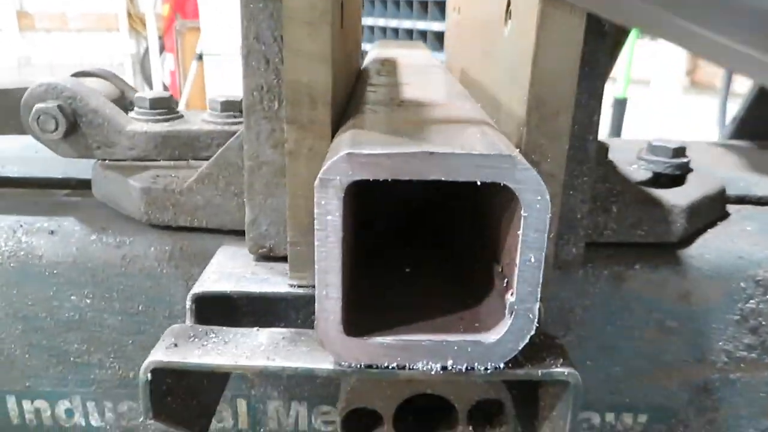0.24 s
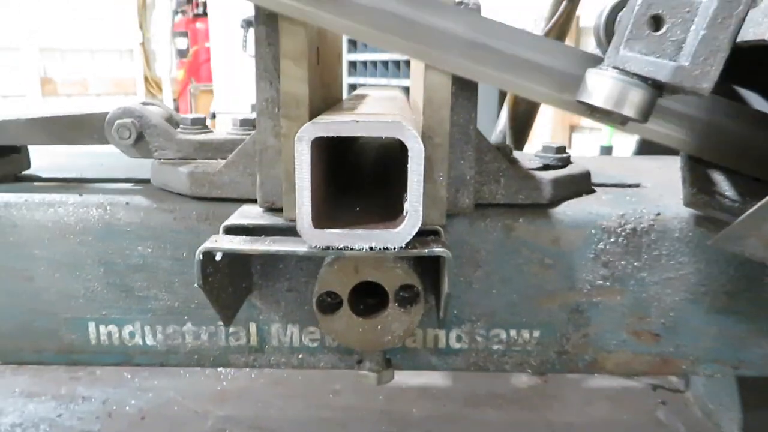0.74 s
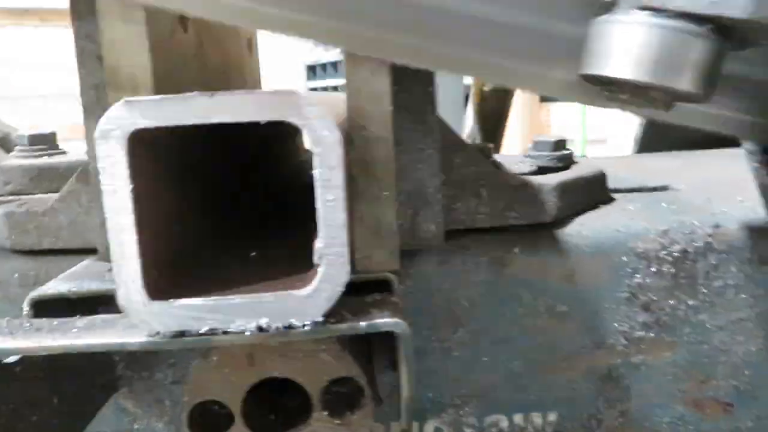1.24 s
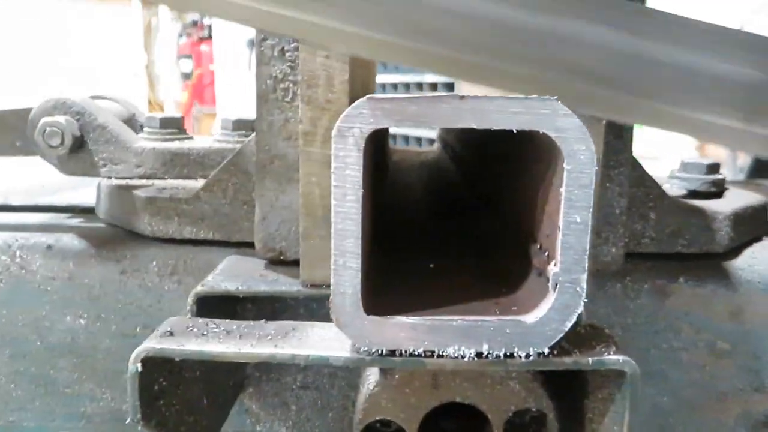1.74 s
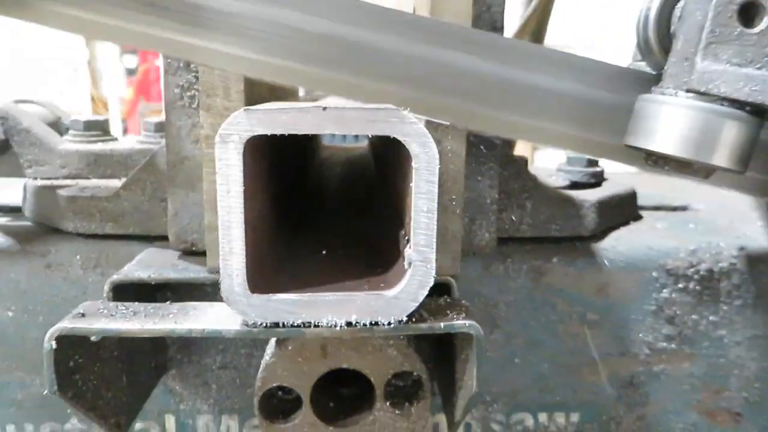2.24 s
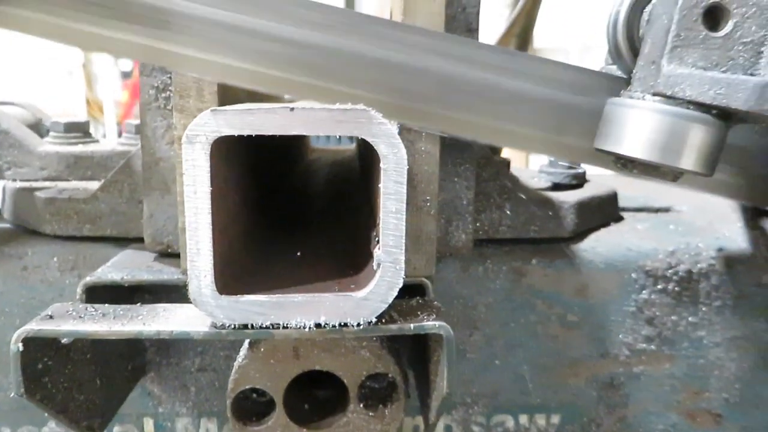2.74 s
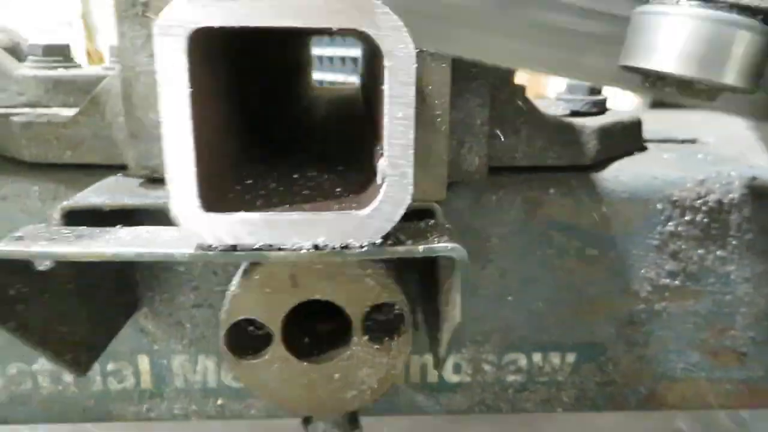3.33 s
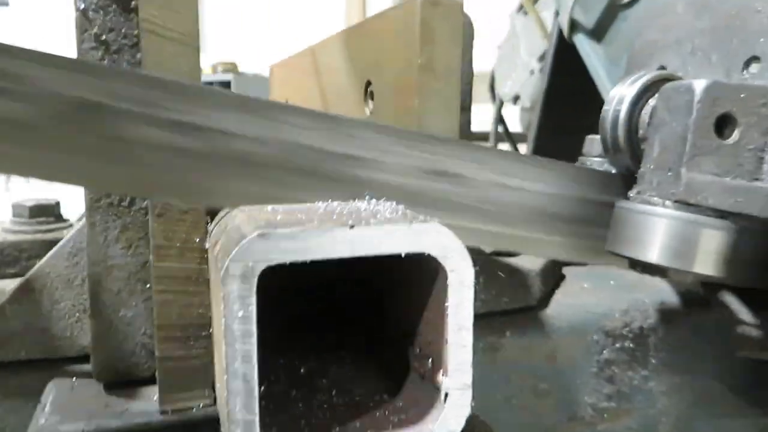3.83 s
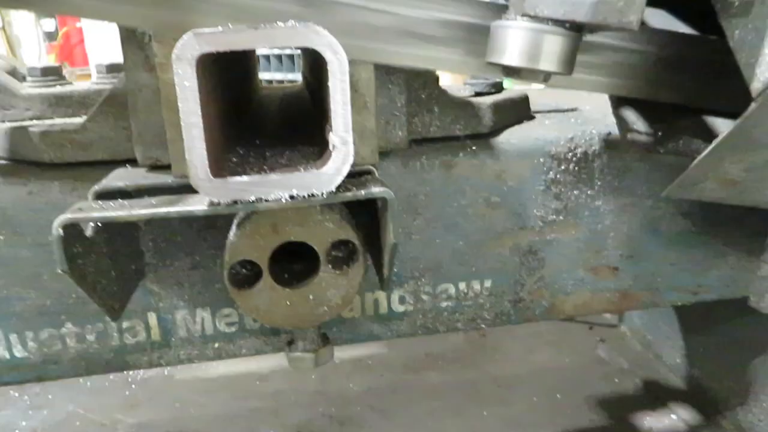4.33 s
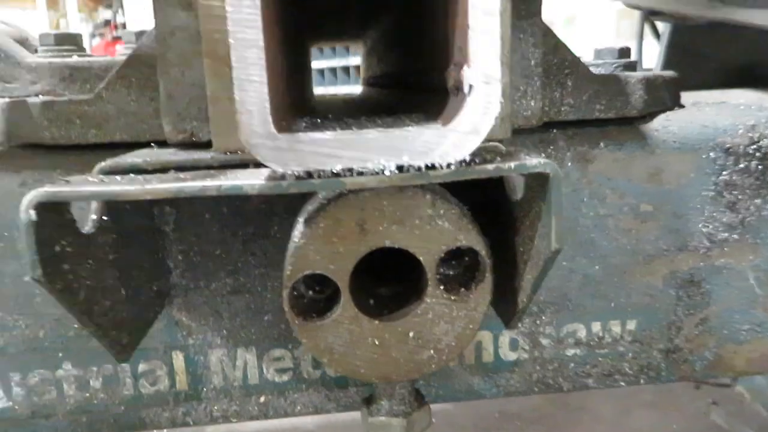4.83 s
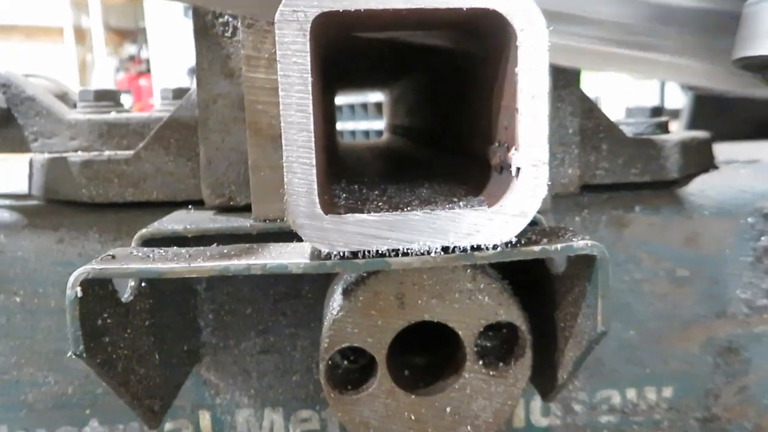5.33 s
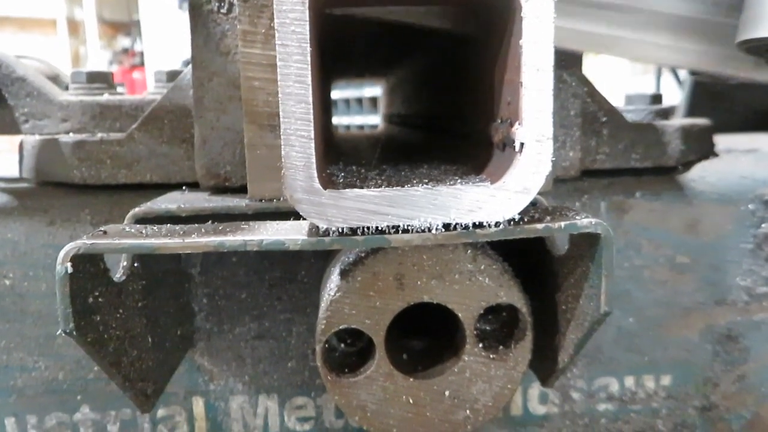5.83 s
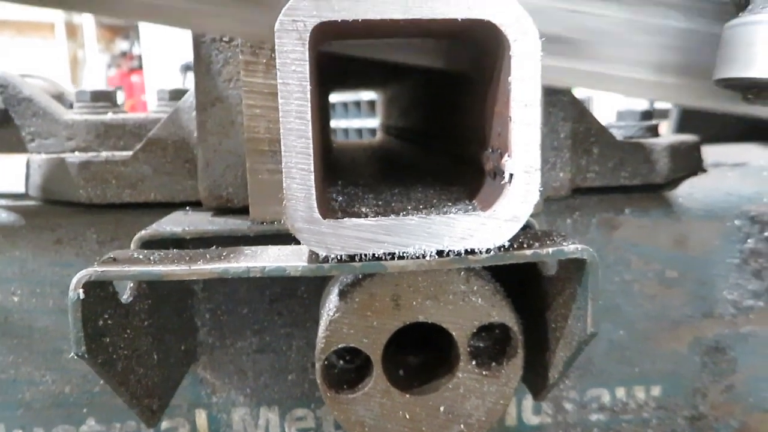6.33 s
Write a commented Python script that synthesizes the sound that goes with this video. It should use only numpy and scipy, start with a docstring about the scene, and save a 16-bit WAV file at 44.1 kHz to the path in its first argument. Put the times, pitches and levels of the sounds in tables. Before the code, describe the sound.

A bandsaw runs throughout, close and dry, cutting a hollow steel tube in a workshop, with no pause or fade. From 0 to 1.7 s the blade touches lightly: a sharp, steady whine near 1.8 kHz, with small hiccups and a fainter second tone, sits over fine gritty rasp, treble rings and humming motor and gear tones. At about 1.7 s the whine collapses within a moment and the full cut begins: a coarser, denser metallic rasp, surging briefly, with shifting tooth tones around 2 to 2.7 kHz, rattling chips, hiss and a rough whistle near 6 kHz. From 3.3 s the blade joint gives short metallic knocks every half second, weakening toward the end, each followed by a tiny dip. Around 5.1 to 5.25 s a guide roller makes three quick squeaks. Grinding continues to 6.6 s, gradually slightly brighter, over very faint rumble and hiss.

```python
"""A horizontal bandsaw cuts a square steel tube, heard close by through a hand-held phone.
Chip clicks ring the resonances of blade, tube and frame; the cut is first light, then bites deeper.
Light contact whines, the full cut adds tooth tones, and treble rings and a rough whistle wander.
The blade joint knocks once a turn late on, the level dips after each knock and at a few other moments,
and a guide roller squeaks briefly. Motor and gear tones hum above faint rumble and hiss."""
import sys
import numpy as np
from scipy import signal
from scipy.fft import rfft, irfft
from scipy.io import wavfile
from scipy.ndimage import uniform_filter1d

SR = 44100
rng = np.random.default_rng(int(sys.argv[2]) if len(sys.argv) > 2 else 0)


def waveform_to_disk(signal):
    """Save audio, clipped to [-1, 1], as 16-bit WAV at the path in sys.argv[1]."""
    frames = np.transpose(np.atleast_2d(signal))
    scaled = np.clip(frames, -1, 1) * 32767
    samples = np.round(scaled).astype(np.int16)
    wavfile.write(sys.argv[1], SR, samples)


N = 290178
T = np.arange(N) / SR
HZ = np.maximum(np.arange(N // 2 + 1) * SR / N, 1)

# Passage from light contact to the full cut: start and end in seconds.
BITE_S = (1.69, 1.72)
# Gear turn rate: in light contact and in the full cut, in Hz.
GEAR_HZ = (82.62, 82.07)
# Resonances of blade, tube and frame. Each row: width in Hz, light gain in dB, full-cut gain in dB.
MODES = [(30, -25, -7), (60, -25.5, -34), (39.7, -23, 3.5), (30, -29, -2), (71, -17, 5.5), (84.5, -15.5, 9),
         (47, -17, 7.5), (50, -6, -23), (130, -9.5, 9), (50, -18, -12), (60, -38, 4.5), (60, -33, -23),
         (180, -15, -9), (125, -4, 1.5), (223, -9, 1), (100, -15, -9.5), (69.6, -12.5, -4.5),
         (80, -21.5, -9), (150, -18.5, -9), (210, -20, -8), (170, -32, -7), (162, -19, -7), (91, -19, -3),
         (80, -25, -30), (280, -28, -8.5), (1330, -36, -11)]
# Blade joint passing the cut, one row a turn. Each row: peak in dB before the high-pass,
# nominal depth in dB of the level dip that follows, share of the lower tube mode in dB.
KNOCKS = [(-15.5, 4, -8), (-16, 4, 0), (-16.5, 3.5, -6), (-19, 2, -5), (-20, 3.5, -3), (-26, 1.6, -3),
          (-26, 1.2, -3)]
FIRST_KNOCK_S, TURN_S = 3.3005, 0.5198


def undb(db):
    """Amplitude ratio from decibels: 20 dB is a factor of ten."""
    return 10 ** (np.asarray(db) / 20)


def unit(x):
    """Normalisation to unit root-mean-square."""
    return x / np.sqrt(np.mean(x ** 2))


def curves(table):
    """Linear interpolation in time of the columns of a table."""
    s, *columns = np.transpose(table)
    return [np.interp(T, s, c) for c in columns]


def walk(rate, count=N):
    """Low-pass random fluctuation: levels held 1 / rate s, averaged twice, scaled to rms 1."""
    hold = int(SR / rate)
    steps = np.repeat(rng.standard_normal(count // hold + 1), hold)
    smooth = uniform_filter1d(uniform_filter1d(steps, hold), hold)
    return unit(smooth[:count])


def colour(points):
    """Spectral envelope: gain at every frequency, in dB linear over log frequency."""
    hz, db = np.transpose(points)
    return undb(np.interp(np.log(HZ), np.log(hz), db))


def tone(hz, db):
    """Phase as the integral of frequency: a sine whose pitch and rms level may move."""
    cycles = np.cumsum(hz + 0 * db) / SR + rng.random()
    return np.sqrt(2) * undb(db) * np.sin(2 * np.pi * cycles)


def cutting(bite, levels_db):
    """Forced resonance: chips ring the saw, in five frequency ranges that each flicker alone."""
    # Borders between the five ranges, in Hz.
    edges_hz = (2400, 3350, 4700, 7000)
    # Broad colour under the resonances in light contact. Each row: frequency in Hz, gain in dB.
    light_broad = [(18, -44), (45, -47), (240, -44), (330, -24.5), (440, -41), (700, -35), (1000, -27.5),
                   (1550, -22), (1800, -12), (2700, -16.5), (3400, -22.5), (4500, -24.5), (6600, -26),
                   (10300, -27.5), (12000, -31.5), (15800, -29.5)]
    # The same in the full cut. Each row: frequency in Hz, gain in dB.
    full_broad = [(18, -22), (45, -22.5), (240, -21.5), (330, -6), (440, -16), (700, -7.5), (1000, -1.5),
                  (1550, -1.5), (2100, 8.5), (3300, -9.5), (4600, -14.5), (6500, -15.5), (9000, -10.5),
                  (12000, -14.5), (15800, -10.5)]
    force = chips()
    _, light_db, full_db = np.transpose(MODES)
    light = force * body(light_db, light_broad)
    full = force * body(full_db, full_broad)
    below = [0] + [1 / (1 + (HZ / edge) ** 16) for edge in edges_hz] + [1]
    out = 0
    for k, db in enumerate(levels_db):
        share = below[k + 1] - below[k]
        light_sound = unit(irfft(light * share, N))
        full_sound = unit(irfft(full * share, N))
        both = (1 - bite) * light_sound + bite * full_sound
        out = out + undb(db + 0.12 * walk(14)) * both
    return out


def chips():
    """Impulsive excitation: spectrum of dense clicks of uneven size, throbbing with the gear turn."""
    force = unit(rng.standard_normal(N) * undb(rng.exponential(size=N)))
    force *= 1 + 0.067 * np.sin(2 * np.pi * GEAR_HZ[1] * T)
    flicker_db = 0.71 * walk(25.066) + 0.6 * walk(120)
    return rfft(force * undb(flicker_db))


def body(modes_db, broad):
    """Modal response: the powers of the resonances add to that of a broad colour."""
    # Centres of the resonances, in Hz.
    mode_hz = (572, 880, 1100, 1200, 1390, 1700, 1815, 2090, 2240, 2580, 2695, 2880, 3010, 3680, 3860, 4260,
               4390, 5020, 5910, 7610, 8440, 9890, 10280, 10600, 11050, 13700)
    widths = np.transpose(MODES)[0]
    power = colour(broad) ** 2
    for hz, width, db in zip(mode_hz, widths, modes_db):
        peak = undb(db) / (1 + (2 * (HZ - hz) / width) ** 2)
        power = power + peak ** 2
    return np.sqrt(power)


def ranges(bite, tube_db, ring_db):
    """Load-dependent radiation: range levels step and surge at the bite, creep and swell once a turn."""
    # Low rasp, tube rasp, blade ring, chip rattle, chip hiss. Each row: light level in dB,
    # full-cut level in dB, surge at the bite in dB, creep as the cut deepens in dB per second.
    range_levels = [(-31.5, -34, -0.5, 0.0), (-42, -41.5, 7.5, 0.5), (-33.5, -33.5, 0, 0.24),
                    (-43, -44, 5.5, 0.95), (-39, -37, -1, 0.5)]
    # Treble level changes. Each row: time in seconds, chip rattle in dB, chip hiss in dB.
    treble = [(0, 3, 0), (.3, 1, 2), (.6, -1, 0.5), (1.15, 0.5, 0), (1.6, 1, -0.5), (1.8, -1.5, 0.5),
              (2.4, 0.5, 0), (3, -1, 1.5), (3.55, 2.5, 0.5), (3.85, 0, -2), (4.1, 0.5, 1), (4.7, 0.5, 1),
              (5.1, -1.5, 0.5), (5.3, 0, 0), (5.8, 1, -0.5), (6.3, 2.5, -1), (6.58, 0, 0)]
    surge_s = 0.41  # the surge holds, then dies away
    joint_swell_db, joint_swell_s = 1.6, 0.01
    since = np.maximum(T - BITE_S[1], 0)
    surge_shape = np.exp(-(since / surge_s) ** 3)
    # time from the nearest passage of the joint
    from_joint = ((T - FIRST_KNOCK_S) / TURN_S + .5) % 1 * TURN_S - TURN_S / 2
    swell = joint_swell_db * np.exp(-(from_joint / joint_swell_s) ** 2)
    db = []
    for light, full, surge, creep in range_levels:
        change = full - light + surge * surge_shape + creep * since + swell
        db.append(light + bite * change)
    rattle_db, hiss_db = curves(treble)
    db[1] = db[1] + tube_db
    db[2] = db[2] + ring_db
    db[3] = db[3] + rattle_db
    db[4] = db[4] + hiss_db
    shared = falter()
    rasp = [level + shared for level in db[:3]]
    return rasp + [level + 0.7 * shared + 0.74 * falter() for level in db[3:]]


def falter():
    """Poisson-like events with exponential recovery: sudden small drops of level, in dB."""
    per_s, mean_drop_db, recovery_s = 5, 2.5, 0.02
    block = 100  # samples
    chance = rng.random((N // block + 1, 2))
    drops = np.where(chance[:, 0] < per_s * block / SR, -np.log(chance[:, 1]), 0)
    recovering = signal.lfilter([1], [1, -np.exp(-block / SR / recovery_s)], drops)
    return -mean_drop_db * np.repeat(recovering, block)[:N]


def teeth(bite, tube_level_db):
    """Periodic impact: teeth strike the wall in turn and sound multiples of the tooth rate."""
    # Steady orders. Each row: multiple of the tooth rate, level in dB.
    steady_orders = [(8, -56), (12, -53), (13, -52)]
    # Multiples of the tooth rate that come and go.
    moving_orders = (14, 15, 16, 17, 18)
    # Their levels as the cut moves through the wall. Each row: time in seconds, five levels in dB.
    moving_levels = [(1.72, -38, -48, -47, -39, -44), (1.87, -40, -39, -46, -37, -37),
                     (2.1, -46, -35, -47, -42, -36), (2.19, -46, -43, -52, -51, -46),
                     (2.8, -45, -43, -52, -53, -46), (3.1, -46, -50, -56, -54, -50),
                     (3.45, -44, -44, -56, -56, -54), (3.75, -40, -44, -52, -52, -49),
                     (4.05, -40, -46, -53, -51, -48), (4.5, -42, -45, -49, -54, -51),
                     (4.9, -46, -45, -47, -54, -50), (5.3, -54, -48, -50, -52, -52),
                     (5.55, -50, -48, -44, -46, -48), (5.8, -44, -47, -44, -45, -46),
                     (6.1, -46, -40, -39, -47, -46), (6.4, -50, -39, -42, -44, -47),
                     (6.58, -48, -48, -45, -48, -46)]
    tooth_hz = 150.0 + 0.155 * walk(4)
    swell_db = .8 * (tube_level_db - np.median(tube_level_db))
    out = 0
    for order, db in steady_orders:
        out = out + tone(order * tooth_hz, db + swell_db + 5.6 * walk(8))
    for order, db in zip(moving_orders, curves(moving_levels)):
        out = out + tone(order * tooth_hz + 3 * walk(30), db + 2 * walk(17))
    return bite * out


def whine():
    """Self-excited chatter on one blade mode and its octave, beside a second line, dying in the bite."""
    # The whine breaks off. Each row: centre in seconds, length in seconds.
    breaks = [(.02, .02), (.205, .013), (.325, .008), (.44, .011), (.53, .008), (.825, .015), (1.155, .014),
              (1.32, .012), (1.69, .011)]
    # Second line. Each row: time in seconds, level in dB before a cut of 1.5 dB.
    second_line = [(0.0, -36), (0.05, -37), (0.076, -51), (0.272, -46), (0.736, -41), (0.798, -53),
                   (0.838, -36), (1.07, -45), (1.328, -30), (1.41, -37), (1.818, -43), (1.85, -49)]
    whine_hz, second_hz, fade_from_s = 1829.5, 2085, 1.74
    whine_db, octave_db = -30, -47.5
    after = np.maximum(T - fade_from_s, 0)
    gaps = sum(np.exp(-((T - s) / length) ** 2) for s, length in breaks)
    loss_db = 250 * after + 18 * gaps
    # the pitch sags 300 Hz per s as it dies and rises in the breaks
    hz = whine_hz - 300 * after + 1.6 * walk(40) + 2.2 * walk(3) + 25 * gaps
    main = tone(hz, whine_db - loss_db + 1.3 * walk(25))
    octave = tone(2 * hz, octave_db - loss_db + 3 * walk(40))
    second_fade_db = 200 * np.maximum(T - second_line[-1][0], 0)
    second_db = curves(second_line)[0] - 1.5 - second_fade_db + 3.1 * walk(24.7)
    return main + octave + tone(second_hz + 4 * walk(29.6), second_db)


def rings():
    """Narrow-band noise by random modulation: treble blade modes that swell and fade on their own."""
    # Centres of the three rings, in Hz.
    ring_hz = (7610, 9890, 11050)
    # Each row: time in seconds, three levels in dB before a cut of 5 dB.
    ring_levels = [(0, -44, -54, -58), (.5, -48, -52, -55), (.85, -44, -42, -56), (1.2, -40, -42, -49),
                   (1.3, -57, -46, -55), (1.65, -54, -56.5, -53), (1.801, -44, -50, -54),
                   (2.3, -45, -50, -50), (3, -51, -48, -49), (3.6, -48, -51, -49), (3.85, -53, -58, -56),
                   (3.95, -45, -58, -53), (4.6, -45, -54, -52), (5.05, -46, -51, -50), (5.3, -48, -51, -54),
                   (6, -53, -47, -48), (6.58, -49.5, -51, -46.5)]
    out = 0
    for hz, db in zip(ring_hz, curves(ring_levels)):
        carrier = tone(hz * (1 + .006 * walk(4)), db - 5 + 2.2 * walk(21.94))
        out = out + carrier * walk(250)
    return out


def whistle():
    """Random modulation of a carrier: a rough narrow band of noise that wanders near 6 kHz."""
    # Each row: time in seconds, centre in Hz, level in dB.
    path = [(0, 5800, -52), (.28, 5680, -44), (.4, 6000, -44), (.5, 5900, -66), (1.65, 5890, -54),
            (1.75, 6070, -42), (2.1, 6200, -49), (2.6, 5900, -62), (4.3, 5420, -50), (4.75, 5650, -48),
            (5.4, 5800, -44), (5.9, 5980, -48), (6.1, 5970, -70), (6.58, 5670, -46)]
    hz, db = curves(path)
    return tone(hz + 70 * walk(30), db) * walk(300)


def knocks():
    """Impact excitation of modes: the joint strikes with a short rough contact and rings the tube."""
    # Tube modes, the second row being the lower tube mode that varies from knock to knock.
    # Each row: frequency in Hz, level in dB, 60 dB decay time in seconds.
    knock_modes = [(2250, -8, .02), (2480, 0, .035), (2650, 0, .035), (3700, -14, .02), (4950, -14, .015),
                   (7200, -16, .012)]
    out, t = np.zeros(N), T[:SR // 20]
    modes = []
    for hz, db, t60 in knock_modes:
        decay = np.exp(-t * np.log(1000) / t60)
        modes.append(undb(db) * decay * np.sin(2 * np.pi * hz * t))
    for k, (db, _, lower_db) in enumerate(KNOCKS):
        contact = .05 * rng.standard_normal(SR // 500)
        contact[0] = 1
        ringing = sum(modes) + (undb(lower_db) - 1) * modes[1]
        blow = np.convolve(contact, ringing)
        i = int((FIRST_KNOCK_S + k * TURN_S) * SR)
        out[i:i + len(blow)] += undb(db) * blow / np.abs(blow).max()
    # nothing low radiates
    return signal.sosfilt(signal.butter(4, 1200, "high", fs=SR, output="sos"), out)


def dips():
    """Gain modulation: the level falls in a few ms and creeps back, after knocks and at set moments."""
    # Dips besides those after knocks. Each row: start in seconds, nominal depth in dB.
    other_dips = [(2.862, 4), (4.27, 2), (5.168, 4), (5.205, 4), (6.21, 2.3)]
    lag_s, fall_s, recovery_s = 0.008, 0.004, 0.06
    after_knocks = [(FIRST_KNOCK_S + k * TURN_S + lag_s, depth) for k, (_, depth, _) in enumerate(KNOCKS)]
    loss_db = 0
    for s, depth in after_knocks + list(other_dips):
        fall = np.clip((T - s) / fall_s, 0, 1)
        recovery = np.exp(-(np.maximum(T - s, 0) / recovery_s) ** 2)
        loss_db = loss_db + depth * fall * recovery
    return undb(-loss_db)


def squeaks():
    """Stick-slip of a roller: short gliding harmonic stacks whose upper partials flicker and die first."""
    # Pitch on a smooth arc. Each row: start in seconds, length in seconds, first, middle and
    # last pitch in Hz, reference level in dB.
    glides = [(5.103, 0.037, 1235, 1105, 1045, -34.5), (5.148, 0.022, 1175, 1192, 1140, -30.5),
              (5.183, 0.065, 1340, 1438, 1310, -28)]
    # One row a squeak: levels of harmonics 1 to 11 in dB re the reference level.
    harmonics_db = [(-2, 2, -1, -4, -6, -20, -20, -13, -20, -20, -20),
                    (-8, -4, -2, 5, -11, -20, -12, -13, -16, -20, -20),
                    (-6, 0, -8, -13, -18, -20, -12, -7, -19, -19, -16)]
    attack_s, release_s, edge_depth_db = 0.008, 0.012, 14  # depth at the fundamental
    dull_db = 12  # loss per harmonic above the fifth by the end of a squeak
    out = np.zeros(N)
    for (start, length, first, middle, last, db), partials in zip(glides, harmonics_db):
        count = int(length * SR)
        u = np.arange(count) / (length * SR)
        arc = 1 - (2 * u - 1) ** 2
        hz = first + (last - first) * u + (middle - (first + last) / 2) * arc
        hz = hz + 3 * walk(150, count)
        nearness = np.minimum(u / attack_s, (1 - u) / release_s) * length
        edge_db = edge_depth_db * np.clip(1 - nearness, 0, 1)
        i = int(start * SR)
        for k, partial_db in enumerate(partials):
            loss_db = (1 + .3 * k) * edge_db + dull_db * max(k - 4, 0) * u ** 4
            flicker_db = (1 + .2 * k) * walk(120, count)
            out[i:i + count] += tone((k + 1) * hz, partial_db + db - loss_db + flicker_db)
    return out


def drive(bite, gear_db, motor_db):
    """Rotational orders and sidebands: motor and gear tones, the gears slowing a little under load."""
    # Each row: motor order, gear order, light level in dB, full-cut level in dB.
    orders = [(0, 4, -44, -47), (0, 5, -69, -70), (0, 6, -72, -64), (0, 7, -66, -62), (0, 8, -69, -67),
              (0, 9, -70, -65), (0, 10, -65, -71), (0, 11, -57, -55), (0, 12, -66, -61), (0, 13, -53, -60),
              (0, 16, -53, -54), (0, 17, -52, -66), (0, 19, -58, -75), (0, 21, -52, -54), (0, 22, -75, -47),
              (0, 27, -50, -75), (0, 44, -75, -44), (1, -4, -68, -75), (1, -3, -68, -72), (1, 0, -47, -43),
              (1, 1, -64, -57), (1, 2, -60, -58), (1, 3, -60, -56), (1, 5, -52, -53), (1, 6, -50, -58),
              (1, 7, -52, -59), (2, 0, -53, -42), (2, 1, -75, -52), (2, 4, -49, -75), (2, 8, -51, -66),
              (3, 0, -52, -58), (4, 0, -46, -46)]
    # Further steady tones. Each row: frequency in Hz, light level in dB, full-cut level in dB.
    hums = [(238, -72, -75), (298, -62, -74), (363, -64, -75), (377, -75, -59), (569, -58, -64),
            (1198, -56, -54), (1258, -59, -75), (1952, -46, -52), (2490, -53, -63), (3530, -62, -52),
            (3694, -60, -46), (4000, -65, -52), (6719, -68, -64), (8068, -75, -55), (8104, -54, -75),
            (10474, -56, -75), (11434, -61, -75)]
    motor_hz = 960.0
    gear_hz = GEAR_HZ[0] + bite * (GEAR_HZ[1] - GEAR_HZ[0]) + 0.031 * walk(3.29)
    out = 0
    for motor, gear, light_db, full_db in orders:
        drift_db = motor_db if motor else gear_db
        db = light_db + bite * (full_db - light_db) + drift_db + 1.5 * walk(8)
        out = out + tone(motor * motor_hz + gear * gear_hz, db)
    for hz, light_db, full_db in hums:
        out = out + tone(hz, light_db + bite * (full_db - light_db) + 1.5 * walk(6))
    return out


def background():
    """Filtered noise: a faint rumble and hiss, to be set in opposite polarity in the two channels."""
    # Colour of the noise. Each row: frequency in Hz, relative gain in dB.
    spread = [(20, 0), (85, -2), (250, -4), (700, -16), (2800, -22), (5700, -9), (15000, -18)]
    noise = rfft(rng.standard_normal(N)) * colour(spread)
    return undb(-84) * unit(irfft(noise, N))


def scene():
    """Superposition: the saw's sources share the level dips; squeaks and background lie outside them."""
    # Slow swells, likely as the hand-held phone moves. Each row: time in seconds, tube rasp in dB,
    # blade ring in dB, gear tones in dB, motor tones in dB.
    drift = [(0.0, 5.5, -5, 3.5, 3), (0.22, 5.5, -1.5, 4.5, 4.5), (0.65, 0.5, 2.5, -1, -4),
             (1.1, 1.5, 2, 0.5, -0.5), (1.65, -3, -2, 2, 4), (1.8, 1.5, -2.5, -0.5, 1.5),
             (2.25, 2, 4, 1.5, -0.5), (2.7, 6, 2.5, 2.4, 0.5), (2.95, 2.8, 1, -0.5, -0.5),
             (3.45, 1.5, 1, 0.5, -0.5), (3.75, 4, -0.5, 2.2, 0.5), (4.25, -1, 0.5, 1.3, 1),
             (4.7, -1, 1.5, 3.5, 2), (5.2, -1, -0.5, 0, 1.4), (5.7, 2.5, -1.5, 2, 1.5),
             (6.58, 1.5, -3.5, -0.6, 1)]
    tube_db, ring_db, gear_db, motor_db = curves(drift)
    bite = np.interp(T, BITE_S, (0, 1))  # 0 light contact, 1 full cut
    levels_db = ranges(bite, tube_db, ring_db)
    saw = cutting(bite, levels_db) + teeth(bite, levels_db[1]) + whine() + rings() + whistle()
    saw = saw + knocks() + drive(bite, gear_db, motor_db)
    mid = saw * dips() + squeaks()
    side = background()
    return np.array([mid + side, mid - side])


def record(dry):
    """Band limitation: the phone cuts the top with a steep elliptic low-pass."""
    top_hz = 15780
    return signal.sosfilt(signal.ellip(16, .3, 65, top_hz, fs=SR, output="sos"), dry)


dry = scene()
out = record(dry)
waveform_to_disk(out)
```